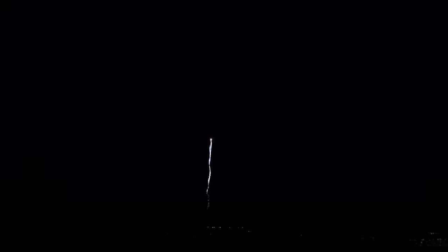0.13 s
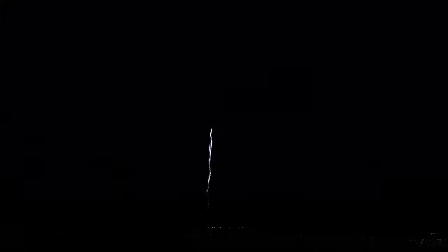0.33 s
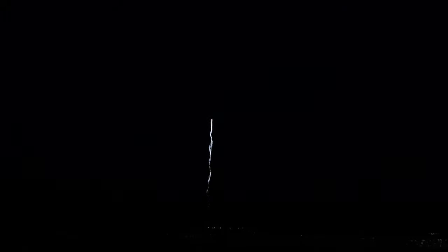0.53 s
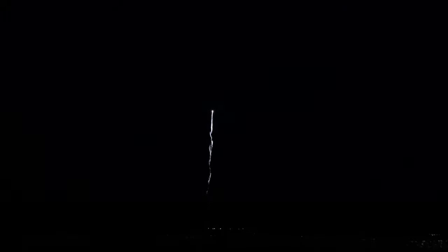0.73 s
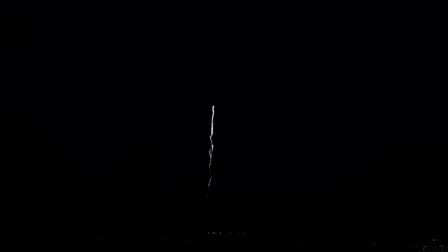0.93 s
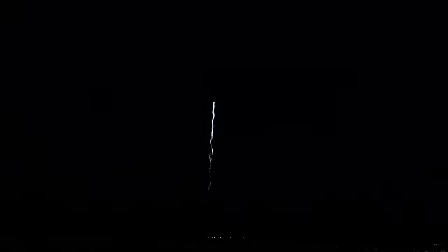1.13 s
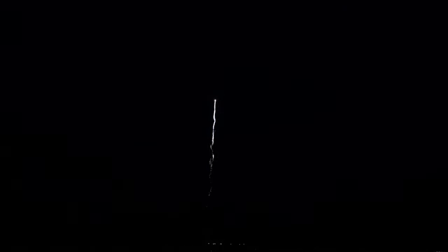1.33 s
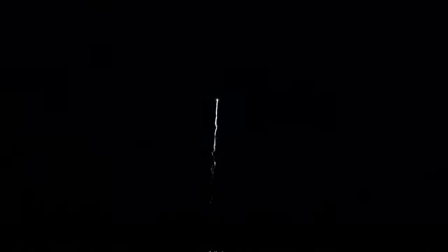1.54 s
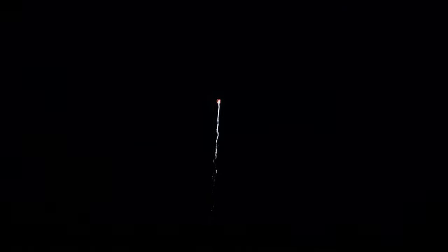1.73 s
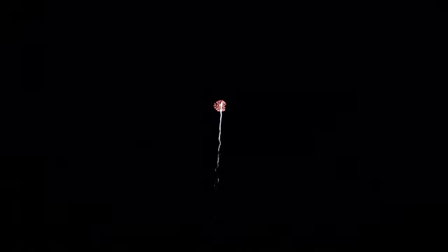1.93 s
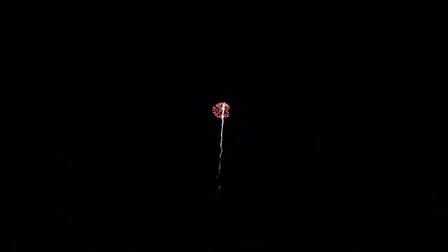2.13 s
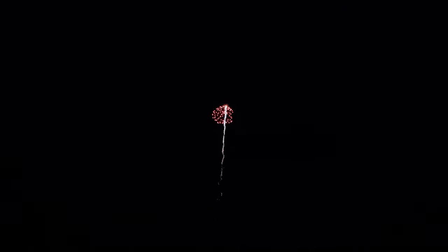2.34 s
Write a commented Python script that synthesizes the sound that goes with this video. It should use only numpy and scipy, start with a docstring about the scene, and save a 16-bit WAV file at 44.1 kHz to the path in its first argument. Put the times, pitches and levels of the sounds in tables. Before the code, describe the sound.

One firework launch bang, abrupt and rattling with a tight low thump, overloads a stereo outdoor microphone, followed by dull separate echoes and fading bass rumble above quiet night air and faint hiss.

```python
"""Open ground at night: far off, a firework shell is fired from its mortar. Tones and noise make a rattling
crack, a sudden pressure reversal overloads the recorder, and tones that sag in pitch make a low thud.
A faint knock is heard ahead of the blast. After it the report comes back as single echoes of filtered snaps
and sagging tones, and as a rolling, fading wash of noise. Beneath lie a steady low rumble, two faint
wavering tones and a hiss."""
import sys
import numpy as np
from scipy import signal
from scipy.fft import rfft, irfft, next_fast_len
from scipy.io import wavfile
from scipy.ndimage import uniform_filter1d

SR = 44100
rng = np.random.default_rng(int(sys.argv[2]) if len(sys.argv) > 2 else 0)


def wav_record(signal):
    """Record a signal, one row per channel, as 16-bit PCM in the file named by sys.argv[1]."""
    frames = np.transpose(np.atleast_2d(signal))
    bounded = np.clip(frames, -1, 1)
    # unit amplitude maps onto the largest positive 16-bit level
    quanta = np.round(bounded * 32767).astype(np.int16)
    wavfile.write(sys.argv[1], SR, quanta)


N = 105840
T = np.arange(N) / SR  # time [s]

# Tones in the crack: (frequency [Hz], relative level [dB])
RATTLE_TONES = [(455, -6.5), (610, -3), (760, -2), (982, -0.5), (1200, -11), (1330, -6), (1452, 0.5),
                (1585, -4.5)]
# Spectrum of the noise in the crack: (frequency [Hz], relative density [dB])
GRIT_SPECTRUM = [(900, -5), (1700, -12), (2300, 2), (3200, -10), (4500, -22), (6000, -38), (9000, -74)]
# Colouring of the pressure front: (frequency [Hz], gain [dB])
FRONT_COLOUR = [(150, -27), (500, 2), (1500, 3.5), (3000, -5.5), (4300, -10.5), (6200, -22.5), (8000, -20),
                (11000, -23), (14500, -21), (17000, -24)]
# Stereo tilt of the front: (frequency [Hz], left over right [dB])
FRONT_LEFT_OVER_RIGHT = [(3000, -1), (5000, 4), (8000, -9), (13000, -3)]
# Thud: a push ahead, two tones together, a weak short ripple in the thud's tail, and one near reflection:
# (start [s], first pitch [Hz], last pitch [Hz], level before attack [dB], attack [s], decay by 60 dB [s])
THUD_TONES = [(0.244, 127, 78, -1.5, 0.0019, 0.0089), (.2468, 140, 20, -4.4, .0041, .0755),
              (.2468, 287, 100, -4.4, .0024, .0534), (0.2657, 150, 140, -19, 0.0013, 0.023),
              (0.2766, 213, 82, -13.5, 0.0014, 0.028)]
# Spectrum of the noise around the front: (frequency [Hz], relative density [dB])
SPRAY_SPECTRUM = [(2500, -32), (4000, 4), (7000, -10), (11000, -11), (13500, -17), (15000, -12),
                  (17000, -30)]
# A faint knock ahead of the blast, then single echoes:
# (time [s], crack peak [dB], crack centre [Hz], crack hold [s], thud level before attack [dB])
KNOCK_AND_ECHOES = [(.036, -41, 1480, 0.026, -27), (.346, -32, 1380, 0.0059, -44),
                    (.384, -32, 1300, .025, -16.5), (.42, -35, 1810, 0.019, -19),
                    (.548, -32, 903, .003, -38), (.557, -33, 1090, 0.0044, -26),
                    (.572, -37.5, 1600, .005, -37), (.591, -31, 696, 0.012, -28),
                    (.607, -32, 1090, 0.0044, -32.5), (.666, -24.5, 780, .013, -14.5),
                    (.676, -27, 1100, 0.005, -40.5), (.681, -35, 1970, 0.0033, -41),
                    (.72, -34.5, 895, 0.013, -23.5), (.894, -39.5, 810, 0.015, -38),
                    (1.059, -42, 600, 0.0042, -28.5), (1.105, -37.5, 1320, 0.0073, -29),
                    (1.134, -41.5, 606, 0.01, -35), (1.311, -41, 1440, 0.0027, -36),
                    (1.332, -41, 1430, 0.0069, -29.5), (1.37, -32.5, 1240, 0.0068, -39),
                    (1.378, -45, 1600, 0.006, -45), (1.381, -44.5, 1300, 0.0067, -36),
                    (1.4, -51, 1500, 0.0088, -42), (1.48, -45.5, 1390, 0.0077, -37),
                    (1.657, -36, 1230, 0.0047, -45), (1.694, -39.5, 1450, 0.0065, -38),
                    (1.77, -42.5, 680, 0.011, -44), (2.006, -43, 785, 0.0062, -39)]
# Low echoes without a crack: (time [s], level before attack [dB], first pitch [Hz])
BOOMS = [(0.3263, -8, 168), (.372, -19.5, 151), (0.401, -12.5, 183), (.415, -25, 145), (.631, -20, 91),
         (0.85, -21.5, 92.5), (0.955, -23.5, 76), (1.381, -24, 61), (1.526, -23, 110)]
# Course of the wash: (time [s], bass level [dB], middle level [dB], treble level [dB])
WASH_LEVELS = [(.29, -28.5, -42, -54.5), (.33, -25.5, -46, -60), (.35, -26.5, -47.5, -57),
               (0.392, -22.5, -39.5, -51), (0.434, -28.5, -42.5, -55), (.46, -29, -44, -59.5),
               (.535, -32.5, -46, -55.5), (.555, -25, -42, -45.5), (.62, -26.5, -41, -53),
               (.66, -33.5, -44.5, -55.5), (.7, -35.5, -43.5, -63), (.8, -32, -50, -64.5),
               (.9, -35.5, -47, -65), (1.0, -36.5, -51, -70), (1.249, -40.5, -54.5, -70),
               (1.4, -38, -51, -73), (1.5, -38.5, -55, -70), (1.6, -40.5, -56, -82), (1.85, -39, -59, -71),
               (2.001, -44.5, -63, -85), (2.4, -40.5, -58.5, -68)]
# Spectra of the three wash bands: (frequency [Hz], relative density [dB])
WASH_BASS = [(12, -31.5), (20, -6.5), (48, 5), (184, 1), (240, -6.5), (309, -21), (351, -43.5),
             (420, -30.5), (550, -55), (920, -120)]
WASH_MIDDLE = [(210, -54), (350, -22.5), (617, -2), (860, -10), (949, -4), (1520, -6.5), (1670, -8),
               (3000, -22), (3900, -44.5), (6600, -120)]
WASH_TREBLE = [(1500, -27), (2100, 1), (2900, -1.5), (4000, -8), (5500, -19), (7000, -32), (9000, -52.5),
               (12000, -120)]
# Spectra of the night rumble and hiss: (frequency [Hz], relative density [dB])
RUMBLE_SPECTRUM = [(12, -45), (20, -21), (59, -2), (81, -5.5), (150, -3), (201, -10), (274, -9.5),
                   (357, -17), (382, -21), (456, -19.5), (560, -27), (660, -25.5), (800, -33), (1500, -35),
                   (4000, -45), (5200, -81), (8800, -120)]
HISS_SPECTRUM = [(3000, -38.5), (4200, -1.5), (5500, -7.5), (7000, -13.5), (9000, -18.5), (11500, -27.5),
                 (13500, -37), (16000, -63.5)]
# Wavering tones from afar: (frequency [Hz], width of each resonance [Hz], level [dB])
HUM_TONES = [(266.7, 11.2, -56.5), (454.7, 14, -62)]
# Left-right correlation of the noises: (frequency [Hz], correlation [-1 to 1])
LIKENESS = [(100, 1), (250, .995), (600, .9), (1500, .75), (4000, .6), (9000, .3)]
# Stereo tilt of knock, echoes, wash and night: (frequency [Hz], right over left [dB])
FAR_RIGHT_OVER_LEFT = [(200, 0), (600, 1.1), (1500, 0.99), (4000, .3)]
# Arrival at the left microphone ahead of the right, by source: {source: lead [s]}
LEAD_S = {"blast": 45e-6, "thud": 85e-6, "front": 25e-6, "echo": -0.000082, "late": 95e-6, "night": 0.00011}

# Rise and fall times of swells are times for a factor e.
CRACK_S, CRACK_RISE_S, CRACK_HOLD_S, CRACK_FALL_S = 0.2455, 0.0036, 0.0044, 0.0063
CRACK_PEAK_DB, GRIT_DB = -2.5, -14.5  # grit relative to the tones
FRONT_S, FRONT_DB, FRONT_FALL_S = 0.25232, -1, 0.00028  # level before colouring
PITCH_SAG_S = 0.0156
SPRAY_DB, SPRAY_S = -40, 0.0016
SNAPS_PER_S, SNAP_SCATTER_DB = 2800, 5
ECHO_RISE_S, ECHO_FALL_S, ECHO_TOP_HZ = 0.00073, 0.0036, 3500
EARLY_ECHO_Q, LATE_ECHO_Q = 1.56, 2.60  # far echoes ring in a narrower band
ECHO_THUD_LAG_S, ECHO_THUD_HZ, ECHO_THUD_T60_S = 0.00906, 198, 0.046
BOOM_T60_CYCLES = 5.4  # cycles of the first pitch
LATE_FROM_S, LATE_FADE_S = 0.846, 0.15
WASH_OPENING_S = 0.011
RUMBLE_DB, HISS_DB = -39, -78
CLIP_HARDNESS, TOP_HZ, EDGE_FADE_S = 14, 16500, 0.003


def amp(db):
    """Decibel law: level to amplitude gain."""
    return 10 ** (np.asarray(db) / 20)


def unit(x):
    """Normalisation: equal power, rms 1."""
    return x / np.sqrt(np.mean(x ** 2) + 1e-20)


def along(points, hz):
    """Interpolation: second column against a logarithmic frequency axis."""
    f, v = np.transpose(points)
    return np.interp(np.log(hz + 1), np.log(f + 1), v)


def filtered(x, response):
    """Linear filtering: the spectrum of x, mirrored at its ends, times a complex response."""
    pad = 4096
    wide = np.pad(x, [(0, 0)] * (x.ndim - 1) + [(pad, pad)], mode="reflect")
    m = next_fast_len(wide.shape[-1])
    spectrum = rfft(wide, m) * response(np.fft.rfftfreq(m, 1 / SR))
    return irfft(spectrum, m)[..., pad:pad + N]


def placed(x, lead_s):
    """Arrival-time difference: of two close microphones, the left hears x lead_s before the right."""
    half_turns = lead_s * np.array([[1], [-1]])
    return filtered(x, lambda hz: np.exp(1j * np.pi * hz * half_turns))


def rush(spectrum, lead_s, patchy_db):
    """Partial coherence: coloured stereo noise of rms 1, with random gain patches in time and pitch."""
    noise = signal.stft(rng.standard_normal((2, N)), nperseg=512)[2]
    field = rng.standard_normal(noise.shape[1:])
    field = uniform_filter1d(field, size=6, axis=0)  # smooth over frequency
    field = uniform_filter1d(field, size=10, axis=1)  # smooth over time
    pair = signal.istft(noise * amp(patchy_db * unit(field)), nperseg=512)[1][:, :N]

    def mid_side(hz):
        # Mid and side shares set the left-right correlation to cos(2 angle).
        angle = np.arccos(np.clip(along(LIKENESS, hz), -1, 1)) / 2
        return amp(along(spectrum, hz)) * [np.cos(angle), np.sin(angle)]

    mid, side = filtered(pair, mid_side)
    return unit(placed(np.array([mid + side, mid - side]), lead_s))


def swell(start, rise, hold, fall):
    """Exponential growth and decay: a rise up to start, a hold, then a fall."""
    before, after = np.maximum(start - T, 0), np.maximum(T - start - hold, 0)
    return np.exp(-before / rise - after / fall)


def sagging(start, first_hz, last_hz, db, attack, t60):
    """Frequency relaxation: a dying tone whose pitch nears last_hz exponentially."""
    t = np.maximum(T - start, 0)
    turns = last_hz * t + (first_hz - last_hz) * PITCH_SAG_S * (1 - np.exp(-t / PITCH_SAG_S))
    decay = amp(db - 60 * (t / t60) ** 2)
    return decay * (1 - np.exp(-t / attack)) * np.sin(2 * np.pi * turns)


def resonance(f, hz, width):
    """Damped resonance: response of one causal second-order band-pass."""
    return 1j * f * width / (hz * hz - f * f + 1j * f * width)


def crack():
    """Superposition: fixed tones and a little noise under one short swell give the rattle."""
    tones = unit(sum(amp(db) * np.sin(2 * np.pi * (hz * T + rng.random())) for hz, db in RATTLE_TONES))
    noise = filtered(rng.standard_normal(N), lambda hz: amp(along(GRIT_SPECTRUM, hz)))
    rattle = tones + amp(GRIT_DB) * unit(noise)
    rattle = rattle * swell(CRACK_S, CRACK_RISE_S, CRACK_HOLD_S, CRACK_FALL_S)
    return placed(amp(CRACK_PEAK_DB) * rattle / np.abs(rattle).max(), LEAD_S["blast"])


def front():
    """Pressure discontinuity: pressure grows, reverses sign at once and dies away."""
    u = (T - FRONT_S) / FRONT_FALL_S
    drop = -np.sign(u) * np.exp(-np.abs(u))

    def colour(hz):
        tilt = along(FRONT_LEFT_OVER_RIGHT, hz) / 2 * np.array([[1], [-1]])
        return amp(FRONT_DB + along(FRONT_COLOUR, hz) + tilt)

    return placed(filtered(drop, colour), LEAD_S["front"])


def thud():
    """Low-frequency transient: sagging tones for push, body, a weak short ripple and one near reflection."""
    return placed(sum(sagging(*row) for row in THUD_TONES), LEAD_S["thud"])


def blast():
    """Impulsive radiation: crack, front and thud of the lifting charge add together."""
    return crack() + front() + thud()


def spray():
    """Loss of coherence: bright, partly independent noise at each microphone frays the front."""
    noise = rush(SPRAY_SPECTRUM, LEAD_S["front"], patchy_db=7.5)
    return amp(SPRAY_DB) * noise * swell(FRONT_S, SPRAY_S / 2, 0, SPRAY_S)


def late():
    """Change of direction: share of echoes and wash from the left, rising from 0 to 1."""
    return np.clip((T - LATE_FROM_S) / LATE_FADE_S, 0, 1)


def snaps():
    """Random point process: dense irregular clicks of scattered size, rms 1."""
    chance, size = rng.random(N), rng.standard_normal(N)
    return unit((chance < SNAPS_PER_S / SR) * amp(SNAP_SCATTER_DB * size))


def knock_and_echoes():
    """Band-passed snaps and sagging tones: a faint knock ahead of the blast, then single echoes and booms."""
    out, clicks = np.zeros(N), snaps()
    for s, db, hz, hold, thud_db in KNOCK_AND_ECHOES:
        burst = clicks * swell(s + ECHO_RISE_S, ECHO_RISE_S, hold, ECHO_FALL_S)
        q = LATE_ECHO_Q if s > LATE_FROM_S else EARLY_ECHO_Q
        dulled = filtered(burst, lambda f: resonance(f, hz, hz / q) ** 2 / (1 + (f / ECHO_TOP_HZ) ** 4))
        out += amp(db) * dulled / np.abs(dulled).max()
        out += sagging(s + ECHO_THUD_LAG_S, ECHO_THUD_HZ, 0.79 * ECHO_THUD_HZ, thud_db,
                       attack=0.0067, t60=ECHO_THUD_T60_S)
    for s, db, hz in BOOMS:
        out += sagging(s, hz, 0.39 * hz, db, attack=0.0032, t60=BOOM_T60_CYCLES / hz)
    return placed(out * (1 - late()), LEAD_S["echo"]) + placed(out * late(), LEAD_S["late"])


def wash():
    """Diffuse reverberation: countless weak echoes merge into three noise bands, opening at the front."""
    s, *levels_db = np.transpose(WASH_LEVELS)
    out = 0
    for db, spectrum in zip(levels_db, (WASH_BASS, WASH_MIDDLE, WASH_TREBLE)):
        early = rush(spectrum, LEAD_S["echo"], patchy_db=0.36)
        later = rush(spectrum, LEAD_S["late"], patchy_db=0.36)
        # Square roots keep the power even through the crossfade.
        roll = np.sqrt(1 - late()) * early + np.sqrt(late()) * later
        out = out + amp(np.interp(T, s, db)) * roll
    return np.clip((T - FRONT_S) / WASH_OPENING_S, 0, 1) * out


def night():
    """Stationary noise: low outdoor rumble, resonance-filtered wavering tones and a hiss above."""
    rumble = amp(RUMBLE_DB) * rush(RUMBLE_SPECTRUM, LEAD_S["night"], patchy_db=1.0)
    hum = np.zeros(N)
    for hz, width, db in HUM_TONES:
        tone = filtered(rng.standard_normal(N), lambda f: resonance(f, hz, width) ** 2)
        hum += amp(db) * unit(tone)
    hiss = amp(HISS_DB) * rush(HISS_SPECTRUM, LEAD_S["night"], patchy_db=3.0)
    return rumble + placed(hum, LEAD_S["night"]) + hiss


def scene():
    """Linear superposition: blast and spray over knock, echoes, wash and night, which share a stereo tilt."""
    near = blast() + spray()
    far = knock_and_echoes() + wash() + night()
    sides = np.array([[-1], [1]])
    return near + filtered(far, lambda hz: amp(along(FAR_RIGHT_OVER_LEFT, hz) / 2 * sides))


def record(dry):
    """Saturation and band limiting: the recorder clips at full scale, fades its ends and cuts the top."""
    clipped = dry / (1 + np.abs(dry) ** CLIP_HARDNESS) ** (1 / CLIP_HARDNESS)
    edges = np.sin(np.pi / 2 * np.clip(np.minimum(T, T[-1] - T) / EDGE_FADE_S, 0, 1)) ** 2
    return filtered(clipped * edges, lambda hz: 1 / (1 + (hz / TOP_HZ) ** 24))


dry = scene()
out = record(dry)
wav_record(out)
```